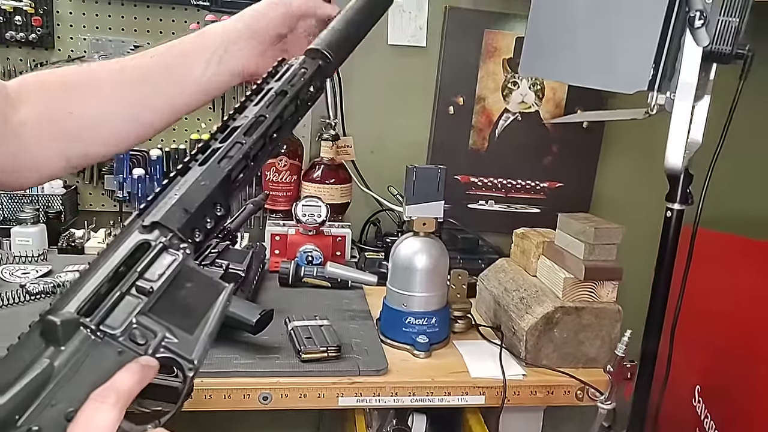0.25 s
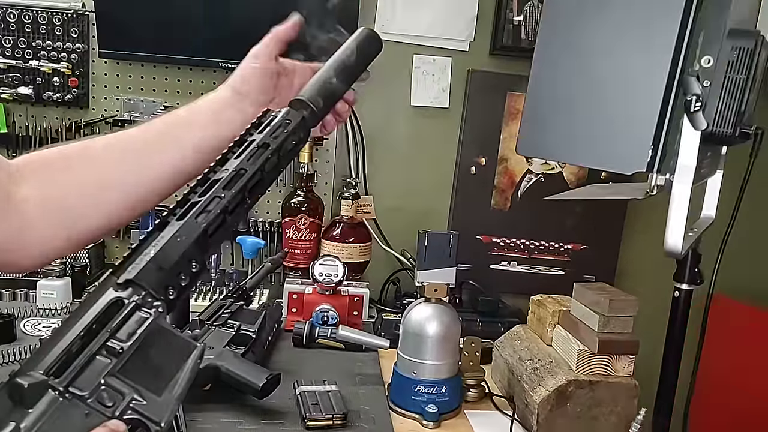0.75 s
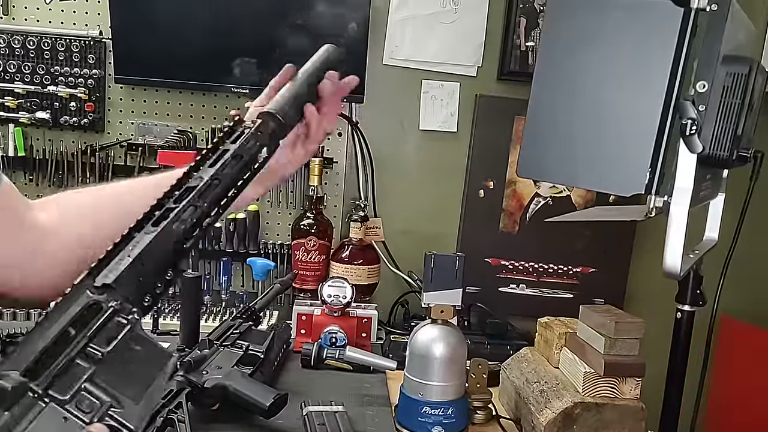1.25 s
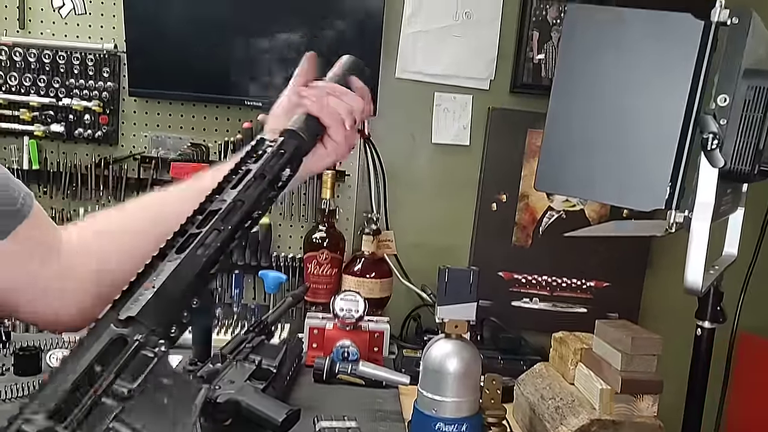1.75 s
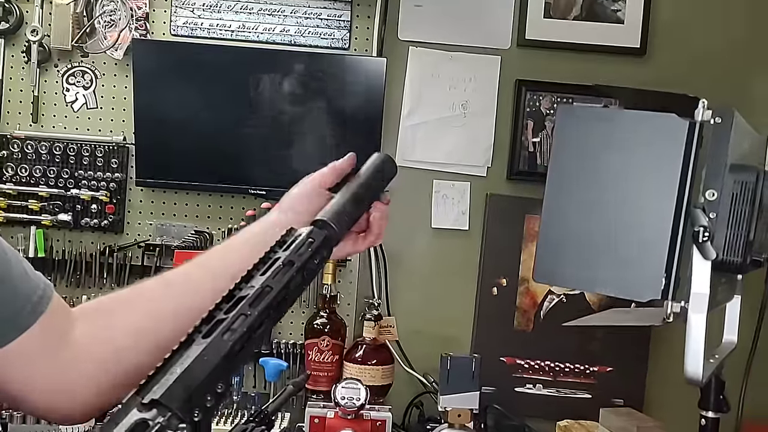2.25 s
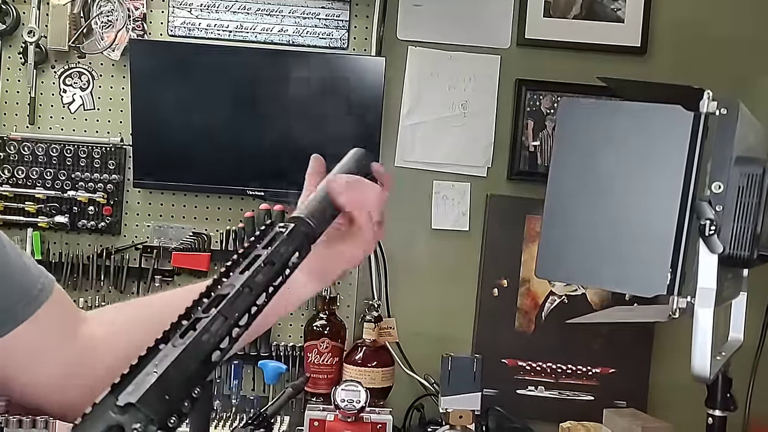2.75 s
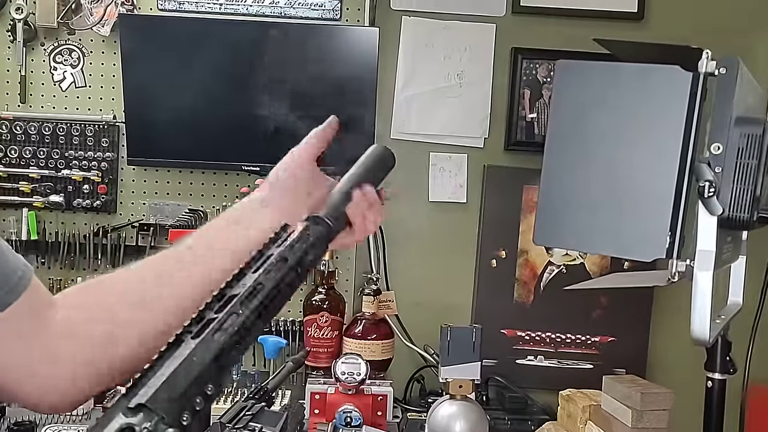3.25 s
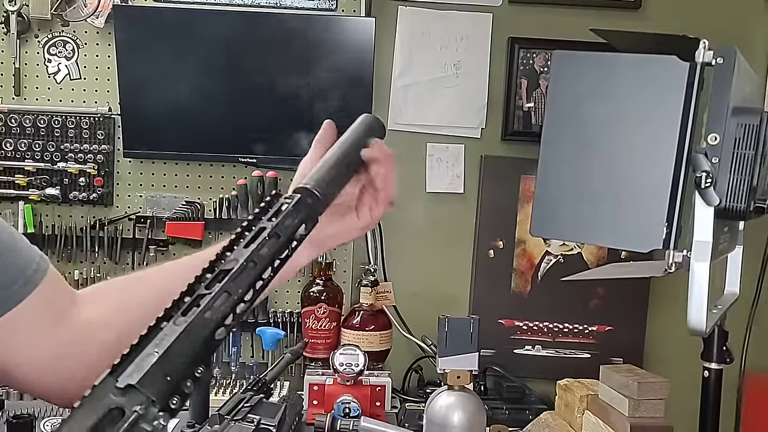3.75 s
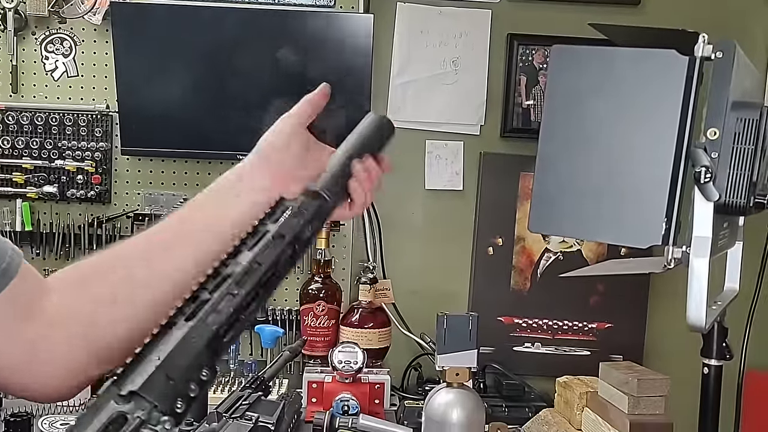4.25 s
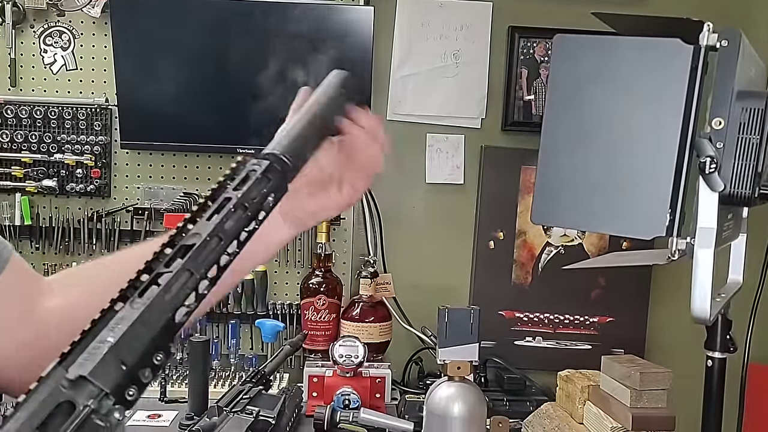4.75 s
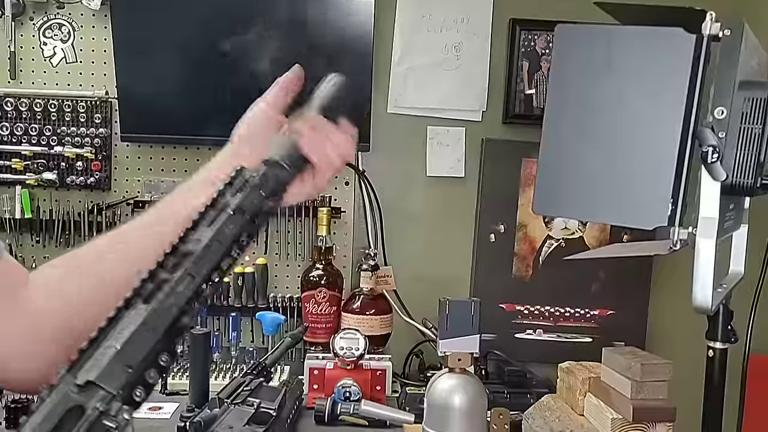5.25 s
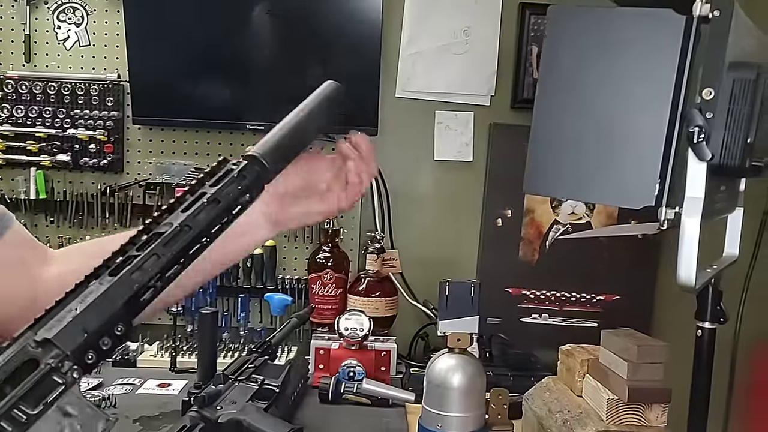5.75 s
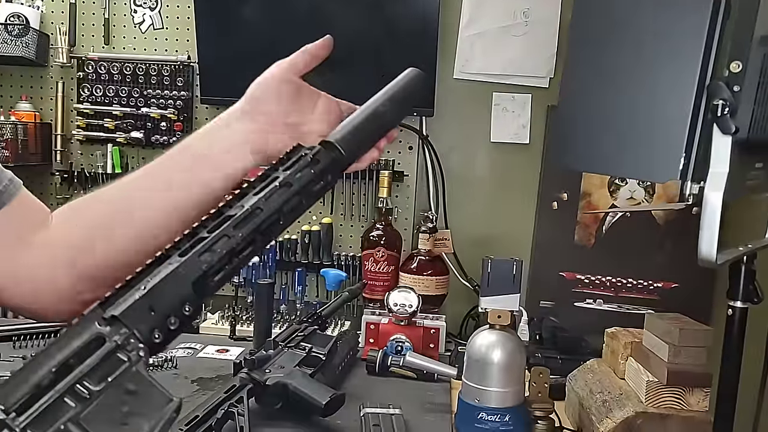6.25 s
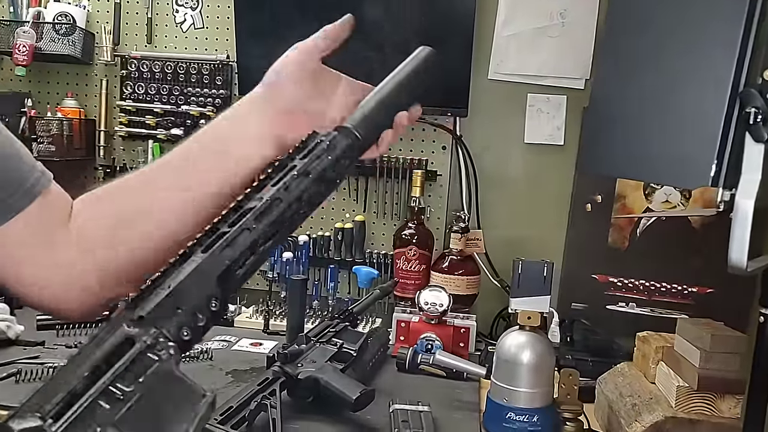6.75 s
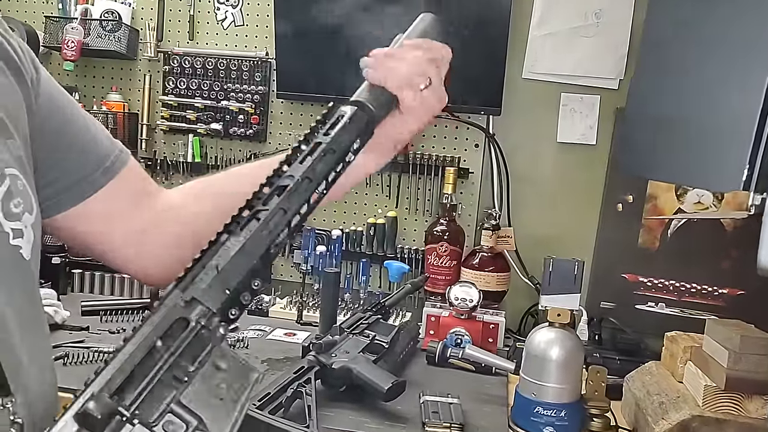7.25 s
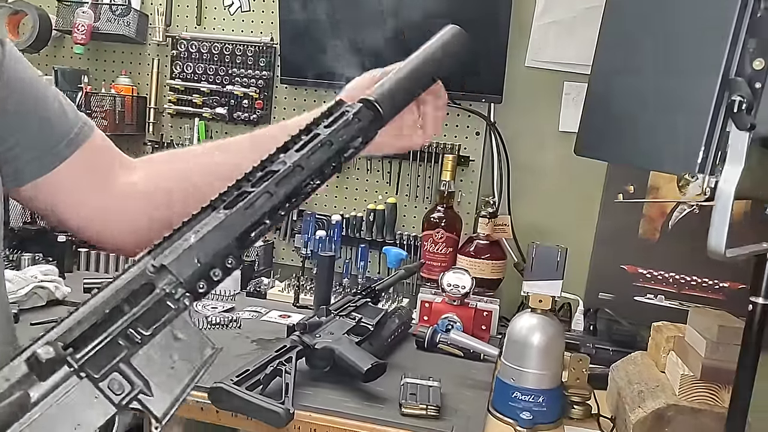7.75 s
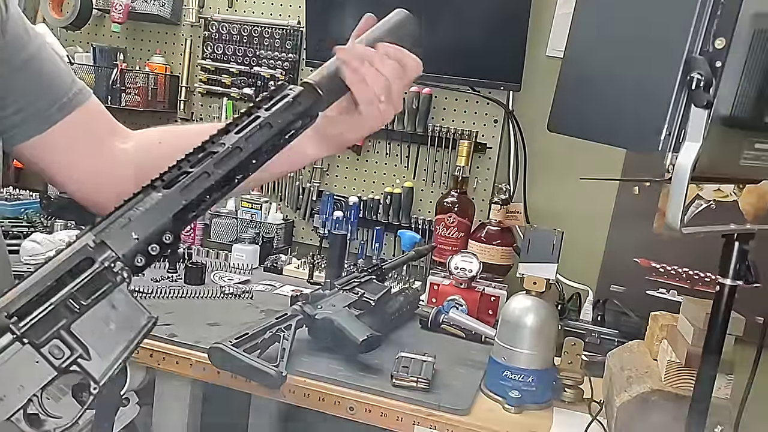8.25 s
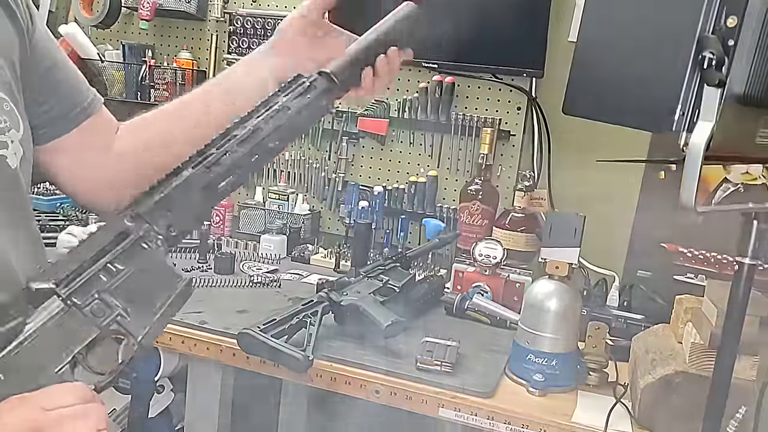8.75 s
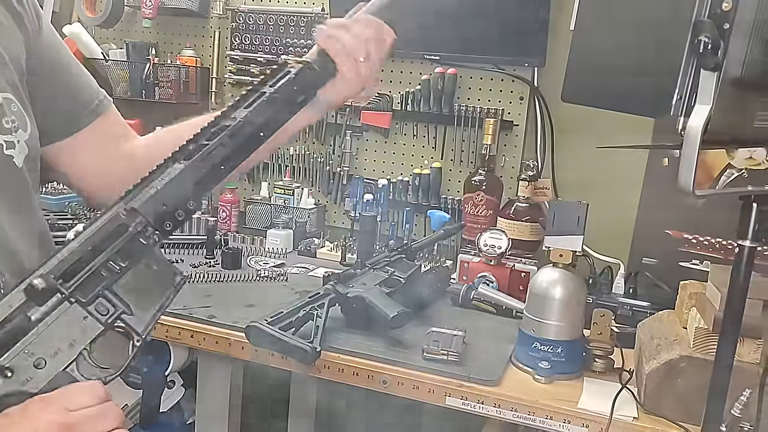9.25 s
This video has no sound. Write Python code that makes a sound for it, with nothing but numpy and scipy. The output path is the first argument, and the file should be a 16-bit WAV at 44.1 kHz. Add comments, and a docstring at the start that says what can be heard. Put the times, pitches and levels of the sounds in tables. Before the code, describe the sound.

Metal threads grind in short wrist turns, rasping mid tones with light hiss and dull handling rumble. Hollow clacks and ticks of the loose fit scatter among them. The brisk rhythm breaks after six seconds into a light rattle and softer scrapes, then a small bright ring and three stronger, more tonal grinds. Close, dry small room, muffled treble, gated pauses.

```python
"""Steel tube screwed onto a rifle muzzle

By hand, one wrist turn after another, in a small workshop; a noise gate silences the quiet gaps.
Random catches on the threads ring the tube's modes as grind and hiss, and the rifle's modes as rumble.
Short chatters of contacts strike the same modes as knocks of the loose fit; a finger ring pings.
Brief reflections and faint room air lie behind, through a narrow-band microphone.
"""
import sys
import numpy as np
from scipy import signal
from scipy.fft import rfft, irfft
from scipy.io import wavfile
from scipy.ndimage import uniform_filter1d

SR = 44100
rng = np.random.default_rng(int(sys.argv[2]) if len(sys.argv) > 2 else 0)


def digitize_waveform(pressure):
    """Quantize a signal to 16-bit integers and store it at the path in sys.argv[1].

    Rows of a 2-D input are taken as channels; values are limited to [-1, 1].
    """
    field = np.atleast_2d(pressure).T
    bounded = np.clip(field, -1, 1)
    quanta = np.round(bounded * 32767).astype(np.int16)
    wavfile.write(sys.argv[1], SR, quanta)


N = 418068

# modes of the held rifle, before the damping each contact adds: pitch_hz, level_db, t60_s
RIFLE_MODES = [(140.6, -2.5, 0.059), (211, 1, 0.038), (315, 2.5, 0.07), (447.3, -6.5, 0.019),
               (700, -16, 0.057)]
# low modes of the tube, likewise: pitch_hz, level_db, t60_s
TUBE_LOW_MODES = [(978, -14.5, 0.043), (1178.6, -7, 0.061), (1712, 2.5, 0.034), (2078, -0.5, 0.027)]
# high modes of the tube, likewise: pitch_hz, level_db, t60_s
TUBE_HIGH_MODES = [(2655, -3, 0.057), (3553, 1.5, 0.05), (4500, -7, 0.033), (5770, -13.5, 0.027),
                   (7100, -5, 0.019)]
# the tube's main mode stands out of the grind as it seats: time_s, share_db
SINGING = [(0, -6), (7.4, -6.5), (8.3, 20), (9.48, 0)]
# steady rumble of the held rifle: time_s, level_db
STEADY_RUMBLE = [(0, -40.5), (.3, -57), (.9, -52.5), (1.3, -55), (1.7, -45), (2.4, -52.5), (3.2, -53),
                 (4, -50.5), (5.8, -48), (6.3, -61), (8.3, -60.5), (9.48, -52.5)]
RUSTLE_DB = -82.5   # the hands never rest quite still


def threads():
    """Threads catch and slip: the tube grinds and hisses, the rifle rumbles in the hand."""
    grind_gain, hiss_gain, rumble_gain = rub_gains()
    singing_share = in_time(SINGING)

    mixed_modes = rubbed(TUBE_LOW_MODES, 1200, 5.0, 0.94, 7.4, 1300, 2200, -10.0, 5.4, glide=0.044)
    main_mode = rubbed(TUBE_LOW_MODES[2:3], 1500, 2.1, 0.58, 0, 1400, 2100, -5.0, 2.6)
    grinding = dull(mixed_modes + singing_share * main_mode, edge_hz=2200, order=4)
    grind = grind_gain * grinding / np.sqrt(1 + singing_share ** 2)   # singing shifts colour, not effort

    hissing = rubbed(TUBE_HIGH_MODES, 6000, 1.5, 0.22, 4.5, 2400, 5000, -1.5, 2.5, glide=0.02)
    hiss = (hiss_gain + from_db(RUSTLE_DB)) * hissing

    rumbling = rubbed(RIFLE_MODES, 1200, 3.2, 0.57, 3.0, 80, 450, -6.0, 4.5, clumps_hz=14, glide=0.05)
    rumble = dull((rumble_gain + shaking() + in_time(STEADY_RUMBLE)) * rumbling)
    return gate_open(0.0059) * (grind + hiss + rumble)


# rubs, short slips and the tails of knocks: peak_s, swell_s, sag_s, grind_db, hiss_db, rumble_db
RUBS = [(0.179, 0.12, 0.011, -54.5, -67, -46), (0.615, .002, 0.049, -57, -44, -29.5),
        (0.786, 0.14, 0.088, -41, -48, -52), (0.859, .006, 0.075, -53.5, -66, -41.5),
        (1.047, 0.063, 0.074, -50.5, -64.5, -50.5), (1.357, 0.049, 0.085, -30, -41, -38),
        (1.621, 0.061, 0.13, -35, -42, -53.5), (1.925, 0.11, .1, -27, -36, -46),
        (2.226, 0.043, 0.11, -29, -39.5, -38), (2.539, 0.056, 0.13, -30, -41.5, -33.5),
        (2.845, 0.069, 0.11, -31.5, -36.5, -36), (3.141, 0.052, 0.12, -31.5, -42, -31.5),
        (3.471, 0.061, 0.13, -29.5, -36.5, -36.5), (3.784, 0.063, 0.13, -29, -34.5, -24.5),
        (4.119, 0.045, 0.14, -33, -40.5, -38.5), (4.485, 0.12, 0.11, -36.5, -39, -34),
        (4.798, 0.065, 0.1, -28.5, -35.5, -29), (4.904, 0.0059, 0.13, -47, -62, -59.5),
        (5.098, 0.027, 0.19, -54, -48, -46), (5.46, 0.16, 0.13, -33.5, -44.5, -32),
        (5.807, 0.084, 0.12, -30.5, -37.5, -39), (6.096, 0.053, .14, -30, -34.5, -29),
        (6.672, 0.048, 0.19, -52.5, -60, -45.5), (7.039, 0.062, 0.13, -39, -51.5, -38),
        (7.342, 0.12, 0.16, -44, -56, -50.5), (7.477, 0.017, 0.04, -46.5, -95, -64),
        (7.749, 0.083, 0.069, -38, -58.5, -64), (8.199, 0.0092, 0.23, -68.5, -41, -53.5),
        (8.316, 0.12, 0.18, -38, -62, -67), (8.654, 0.11, 0.14, -28.5, -42.5, -42.5),
        (9.027, 0.069, 0.089, -25.5, -35, -47), (9.377, 0.15, 0.15, -35.5, -46, -54)]
SWELL_DB, SAG_DB, SAG_BEND = 34.5, 42, 1.38   # rise over swell_s, fall over sag_s, steeper towards its end
HISS_STEEPNESS = 1.5   # times the rise in dB, so the hiss sets in later
RUMBLE_LAG_S = 0.021   # the rifle follows late
CREEP_DB, CREEP_DB_PER_S = -27, 182   # faint grind before the swell, re the peak, and its climb


def rub_gains():
    """Each rub, slip or tail swells to its peak and sags away; gains of grind, hiss and rumble."""
    t, gains = np.arange(N) / SR, np.zeros((3, N))
    # one row each for grind, hiss and rumble
    lag_s = np.array([[0], [0], [RUMBLE_LAG_S]])
    steepness = np.array([[1], [HISS_STEEPNESS], [1]])
    for peak_s, swell_s, sag_s, *levels_db in RUBS:
        first = max(0, int((peak_s - 2 * swell_s - 0.15) * SR))
        near = slice(first, int((peak_s + 3 * sag_s) * SR))
        from_peak_s = t[near] - peak_s - lag_s
        swell_db = -SWELL_DB * steepness * (np.maximum(-from_peak_s, 0) / swell_s) ** 2
        creep_db = CREEP_DB + CREEP_DB_PER_S * np.minimum(from_peak_s[0], 0)
        swell_db[0] = np.maximum(swell_db[0], creep_db)
        sag_db = -SAG_DB * (np.maximum(from_peak_s, 0) / sag_s) ** SAG_BEND
        gains[:, near] += from_db(swell_db + sag_db + np.array(levels_db)[:, None])
    return gains


def rubbed(modes, catches_per_s, spread_db, damping, wander_db, low_hz, high_hz, broad_db, clump_db,
           clumps_hz=27, glide=0):
    """Tiny uneven catches drive modes damped by the grip; a broad scrape fills between. damping scales t60."""
    sizes = from_db(spread_db * np.minimum(rng.exponential(1, N), 5)) * rng.choice([-1, 1], N)
    caught = rng.random(N) < catches_per_s / SR
    grit = sizes * caught * from_db(clump_db * drift(clumps_hz))   # catches come in clumps
    rings = np.zeros(N)
    for k, (hz, level_db, t60_s) in enumerate(modes):
        share = from_db(wander_db * drift(5.0))   # each mode's share wanders
        rings += (-1) ** k * share * ring(grit * from_db(level_db), hz, t60_s * damping)
    # pitches slide as the grip shifts
    rings = np.interp(np.arange(N) + np.cumsum(glide * drift(6)), np.arange(N), rings)
    scrape = rms_one(band(grit, low_hz, high_hz))
    rub = rms_one(rings) + from_db(broad_db) * scrape
    # the colour wanders, the effort does not
    return rub / np.sqrt(uniform_filter1d(rub ** 2, SR // 12) + 1e-9)


# the noise gate shuts and opens at set times: shut_s, open_s
GATE_SHUT = [(.36, .61), (1.13, 1.22), (2.395, 2.425), (3.34, 3.385), (3.985, 4.01), (5.29, 5.335),
             (5.61, 5.67), (5.94, 5.98), (6.3, 6.65), (6.79, 6.91), (7.2, 7.283), (7.51, 7.7),
             (7.84, 8.187), (8.455, 8.56), (8.8, 8.9), (9.18, 9.272)]


def gate_open(fade_s):
    """1 while the recorder's noise gate is open, 0 while shut, with short fades between."""
    on = np.ones(N)
    for shut_s, open_s in GATE_SHUT:
        on[int(shut_s * SR):int(open_s * SR)] = 0
    return uniform_filter1d(on, int(fade_s * SR)) ** 2


# knocks of tube on rifle, as drive of each set of modes: time_s, clack_db, thud_db, tick_db, body_db
KNOCKS = [(0.051, -51, -32.5, -59, -32), (0.1776, -70, -36.5, -37.5, -52), (0.612, -33.5, -31, -27.5, -23),
          (0.625, -38.5, -39, -14, -35), (0.6364, -28, -24, -14.5, -10), (0.7746, -20, -38.5, -35, -26),
          (0.7893, -12, -25.5, -23, -39), (1.225, -50, -51, -83, -61), (1.51, -65, -31, -77.5, -41),
          (1.594, -30, -46, -31, -27), (1.784, -38, -47.5, -61, -56), (1.829, -22.5, -54, -43.5, -28.5),
          (1.837, -6, -19.5, -9.5, -6), (2.0888, -49, -31.5, -71, -36), (2.25, -11, -27.5, -13, -38),
          (2.472, -52.5, -44.5, -67, -36.5), (2.5245, -15, -45, -34, -28), (2.6105, -25.5, -36, -66, -26.5),
          (2.772, -43.5, -43.5, -74, -37), (2.8534, -25, -27, -23, -46), (2.9405, -18, -33, -55, -20.5),
          (2.9529, -21, -37.5, -67, -64), (3.0633, -31.5, -30, -61, -26), (3.177, -28.5, -47, -46, -52),
          (3.205, -29.5, -37, -53, -42), (3.3895, -30.5, -29, -62.5, -29.5), (3.485, -12, -20, -26, -30.5),
          (3.5168, -16, -33.5, -25, -22), (3.7989, -16.5, -32.5, -18, -24), (3.8999, -40.5, -36, -56, -56),
          (4.1282, -22, -51, -37, -48), (4.369, -20, -36.5, -56, -37), (4.376, -16.5, -30, -43, -13),
          (4.6254, -26.5, -43.5, -49, -62), (4.645, -26.5, -49, -60, -50), (4.656, -28.5, -40, -47, -55),
          (4.808, -7.5, -40, -19, -47), (4.9125, -22.5, -39, -46, -34), (4.9824, -49.5, -42.5, -60, -45),
          (5.339, -18.5, -26.5, -33, -16.5), (6.047, -39, -37, -52.5, -22), (6.0749, -9.5, -25, -37, -16.5),
          (6.084, -21, -29, -36, -33), (6.103, -8, -38, -24, -20), (6.1188, -9, -27, -20, -29.5),
          (6.1997, -36, -43.5, -47, -44), (6.9134, -24, -30.5, -12.5, -19), (6.9286, -31, -42, -20.5, -27),
          (6.95, -29, -53, -39, -30), (6.961, -45, -64.5, -35, -45.5), (6.9698, -30, -38, -20.5, -22),
          (7.0, -35, -32.5, -17, -14), (7.02, -45, -56, -24, -20.5), (7.1433, -45, -53, -93, -36.5),
          (7.2899, -24.5, -35, -16.5, -22.5), (7.2968, -35, -49, -29.5, -27.5),
          (7.7344, -23, -56, -48, -37), (8.186, -21.5, -61.5, -13.5, -58.5),
          (8.6794, -18.5, -74.5, -35, -38), (9.0115, -12, -33, -34, -45), (9.104, -25, -72, -46, -62),
          (9.279, -24, -26.5, -7.5, -13), (9.305, -25.5, -29.5, -34, -24.5), (9.441, -20.5, -38, -55, -27)]
# dull bumps as the rifle shifts in the hand: time_s, thud_db
BUMPS = [(0.0174, -37.5), (0.2772, -37), (1.7, -41), (1.75, -33), (2.751, -38), (2.886, -37), (4.045, -52),
         (6.328, -54), (6.3631, -58), (6.4707, -59)]
# the finger ring meets the tube and rings out: time_s, ping_db
PINGS = [(0.316, -60.5), (8.189, -20)]
# modes of the finger ring, before contact damping: pitch_hz, level_db, t60_s
FINGER_RING_MODES = [(4220, -3, .06), (4265, -7.5, .2), (4390, -0.5, .3), (6080, 3, 0.022),
                     (7200, -3.5, 0.034), (10670, 14, .02)]
THUD_LAG_S = 0.021 / 8   # the heavy rifle answers a knock slightly late


def knocks():
    """The loose fit strikes: rifle thud and hollow body, clack and tick of the gripped tube, ring ping."""
    knock_s, clack_db, thud_db, tick_db, body_db = np.transpose(KNOCKS)
    bump_s, bump_db = np.transpose(BUMPS)
    ping_s, ping_db = np.transpose(PINGS)
    thud_s = np.r_[knock_s + THUD_LAG_S, bump_s]
    thud_db = np.r_[thud_db, bump_db]

    thud = struck(thud_s, RIFLE_MODES, thud_db, 0.72, 0.00059, 120, 1400, 15.0, push=True)
    clack = struck(knock_s, TUBE_LOW_MODES, clack_db, 0.29, 0.0053, 900, 3900, 21.0)
    tick = struck(knock_s, TUBE_HIGH_MODES, tick_db, 0.073, 0.0042, 1600, 4900, 11.6)
    body = struck(knock_s, RIFLE_MODES[4:], body_db + 6.5, 0.37, 0.0048, 340, 1300, 21.8)
    ping = struck(ping_s, FINGER_RING_MODES, ping_db, 0.59, 0.00075, 3800, 6200, 12.0, push=True)
    return (dull(thud, edge_hz=1000) + dull(clack, edge_hz=2330, order=4) + tick
            + dull(body, edge_hz=1200) + gate_open(0.003) * ping)


def struck(times_s, modes, drive_db, damping, chatter_s, low_hz, high_hz, crack_db, push=False):
    """A short chatter of contacts strikes each mode with its own strength, over a band-passed crack."""
    t = np.arange(SR // 40) / SR
    at = (np.asarray(times_s) * SR).astype(int)[:, None] + np.arange(len(t))
    luck_db = rng.normal(0, 3.8, (len(at), len(modes)))
    # the parts meet within a few milliseconds, then settle
    swell = (1 - np.exp(-t / 0.0016)) * np.exp(-t / chatter_s)
    contacts = rng.standard_normal(at.shape) * (rng.random(at.shape) < 0.15) * swell
    contacts[:, SR // 450] += 2.2   # one contact stands out
    if push:   # all contacts press the same way
        contacts = np.abs(contacts) + swell
    contacts /= np.sqrt(np.sum(contacts ** 2, axis=1, keepdims=True) + 1e-12)

    def chatter(db):
        """All chatters laid in time, each at its own level."""
        return np.bincount(at.ravel(), (contacts * from_db(db)[:, None]).ravel(), N)[:N]

    out = from_db(crack_db) * band(chatter(drive_db), low_hz, high_hz)
    for k, (hz, level_db, t60_s) in enumerate(modes):
        blow = chatter(drive_db + level_db + luck_db[:, k])
        out += (-1) ** k * ring(blow, hz, t60_s * damping)
    return out


SHAKE_DB, SHAKE_T60_S = -9, 0.19   # level against the thud drive, decay


def shaking():
    """Each thud or bump leaves the rifle shaking: a decaying gain for its rumble."""
    time_s, thud_db = np.transpose([(row[0], row[2]) for row in KNOCKS] + BUMPS)
    jolts = np.bincount((time_s * SR).astype(int), from_db(thud_db + SHAKE_DB), N)
    return signal.lfilter([1], [1, -from_db(-60 / (SHAKE_T60_S * SR))], jolts)


ROOM_T60_S, ROOM_DB = 0.072, -16.5


def workshop(x):
    """Dense early reflections that die fast among shelves and tools: a decaying noise tail."""
    t = np.arange(SR // 4) / SR
    tail = rng.standard_normal(len(t)) * from_db(-60 * t / ROOM_T60_S) * (t > 0.004)
    return signal.fftconvolve(x, tail / np.sqrt(np.sum(tail ** 2)))[:N]


# spectrum shape of the room air: pitch_hz, relative level_db
HUSH_SHAPE = [(40, -11.5), (594, 0.5), (843, -10.5), (1050, -20), (7560, -26)]
HUSH_DB = -83


def hush():
    """Faint steady room air: noise shaped in frequency."""
    hz = np.arange(N // 2 + 1) * SR / N + 1
    shape_hz, shape_db = np.transpose(HUSH_SHAPE)
    shape = from_db(np.interp(np.log(hz), np.log(shape_hz), shape_db))
    return from_db(HUSH_DB) * rms_one(irfft(rfft(rng.standard_normal(N)) * shape, N))


def from_db(db):
    """Decibels to gain."""
    return 10 ** (np.asarray(db) / 20)


def in_time(rows):
    """Gain along a curve of levels: time_s, level_db."""
    return from_db(np.interp(np.arange(N) / SR, *np.transpose(rows)))


def rms_one(x):
    """Scale to rms 1."""
    return x / np.sqrt(np.mean(x ** 2) + 1e-20)


def ring(clicks, hz, t60_s):
    """A two-pole resonator: a unit click sets a sine of height about 1 ringing."""
    r, w = from_db(-60 / (t60_s * SR)), 2 * np.pi * hz / SR
    return signal.lfilter([0, np.sin(w)], [1, -2 * r * np.cos(w), r * r], clicks + 1e-18)


def band(x, low_hz, high_hz):
    """Band-pass."""
    sos = signal.butter(2, [low_hz, high_hz], "band", fs=SR, output="sos")
    return signal.sosfilt(sos, x + 1e-18)


def dull(x, edge_hz=780, order=6):
    """Low-pass: heavy parts and soft contacts pass little that is bright."""
    return signal.sosfilt(signal.butter(order, edge_hz, fs=SR, output="sos"), x)


def drift(rate_hz):
    """Slow random wander of rms 1: noise through two equal one-pole low-passes."""
    r = np.exp(-2 * np.pi * rate_hz / SR)
    slow = signal.lfilter([1], [1, -2 * r, r * r], rng.standard_normal(N + SR))
    return rms_one(slow[SR:])   # the first second lets the filter settle


def scene():
    """Hands and rifle close by, a little room that the noise gate also cuts, the hush."""
    near = threads() + knocks()
    room = from_db(ROOM_DB) * workshop(near) * gate_open(0.023)
    return (near + room + hush())[None]


BAND_HZ, STOP_HZ = 7600, 15700 * 1.03   # top of the main band; 60 dB down from here up


def record(dry):
    """A narrow-band microphone: no deep bass, a trace of treble above its band, faint hiss; the top is cut."""
    thin = signal.sosfilt(signal.butter(4, 100, "high", fs=SR, output="sos"), dry)
    narrow = signal.sosfilt(signal.cheby1(10, 1, BAND_HZ, fs=SR, output="sos"), thin)
    mic_hiss = from_db(-100) * rng.standard_normal(dry.shape)
    out = narrow + from_db(-35.0) * thin + mic_hiss
    return signal.sosfilt(signal.cheby2(12, 60, STOP_HZ, fs=SR, output="sos"), out)


dry = scene()
out = record(dry)
digitize_waveform(out)
```